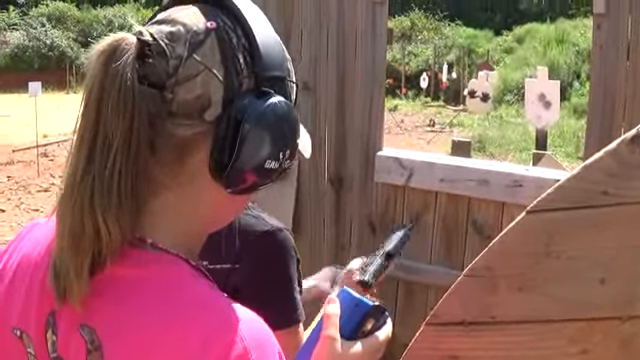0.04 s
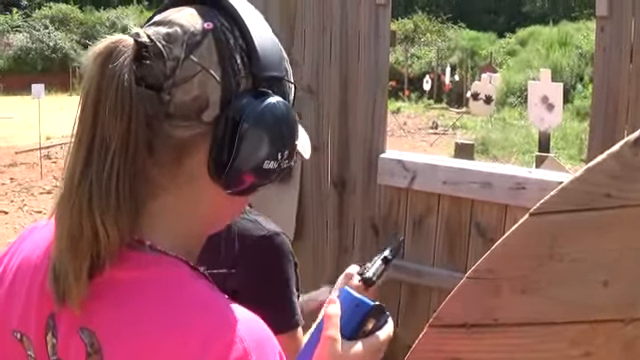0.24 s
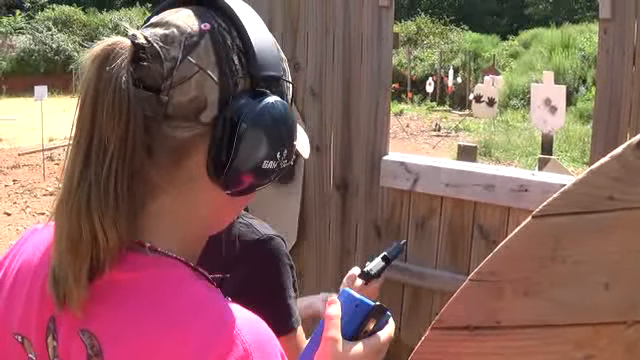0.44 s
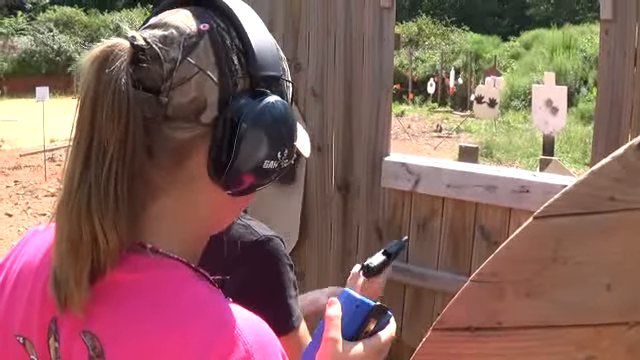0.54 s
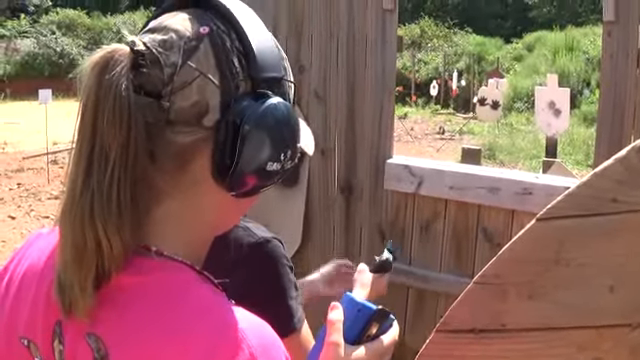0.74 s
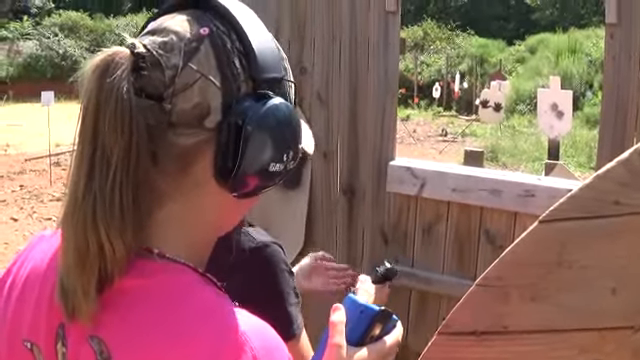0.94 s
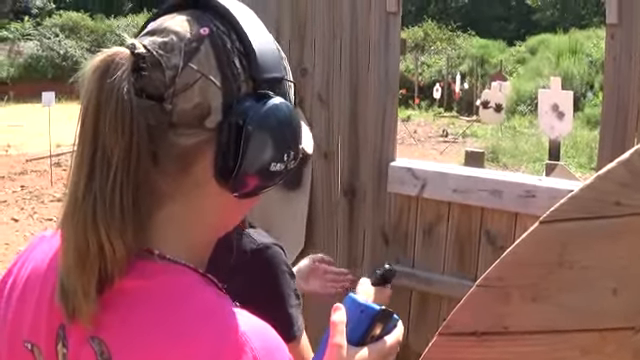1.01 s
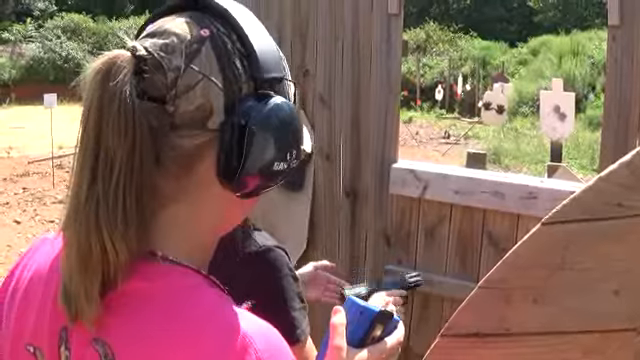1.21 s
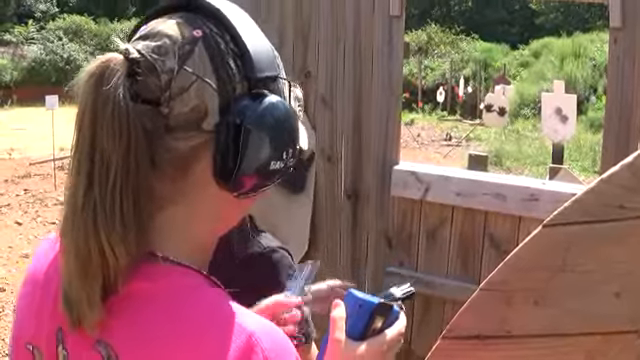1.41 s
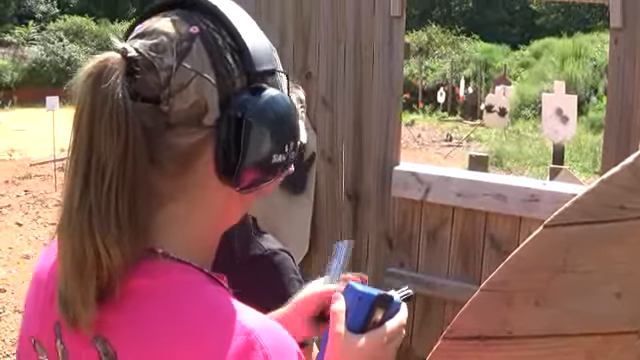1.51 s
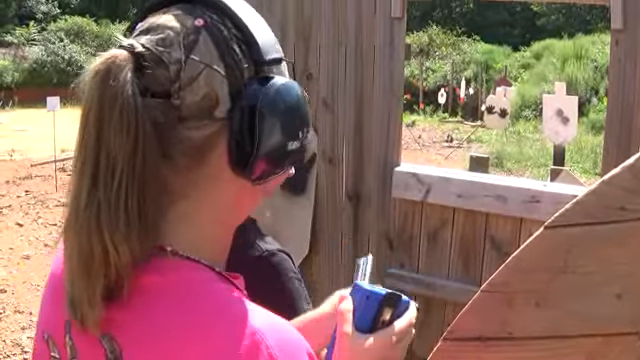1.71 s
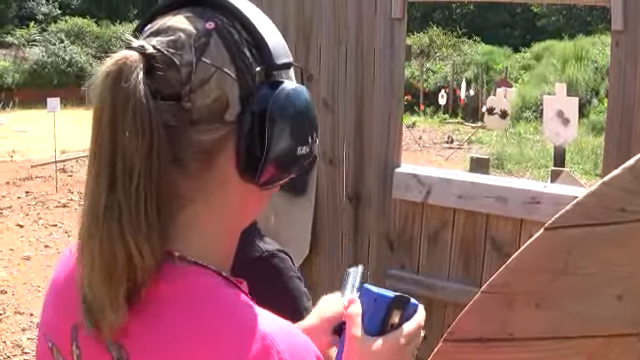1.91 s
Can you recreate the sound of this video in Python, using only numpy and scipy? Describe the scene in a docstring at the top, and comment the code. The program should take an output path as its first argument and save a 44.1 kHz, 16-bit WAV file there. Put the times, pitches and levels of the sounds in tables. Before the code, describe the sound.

In a wooden outdoor shooting bay, a nearby pistol slide closes with a single sharp, briefly ringing clack. Tiny clicks of handling come afterwards, while insects buzz faintly above a quiet wash and a low, distant hum.

```python
"""In a wooden shooting bay, a pistol slide is let go: a dull knock, then a bright clack a moment later.
The slide knocks the frame, steel hits steel, and the metal rings briefly.
The plank walls throw the sound back, and a few faint handling ticks follow.
Insects buzz in the bushes over a soft outdoor wash and a low, distant drone."""
import sys
import numpy as np
from scipy import signal
from scipy.fft import rfft, irfft
from scipy.io import wavfile
from scipy.ndimage import uniform_filter1d

SR = 44100
rng = np.random.default_rng(int(sys.argv[2]) if len(sys.argv) > 2 else 0)


def int16_out(signal):
    """Quantize to a 16-bit WAV file."""
    q = np.round(np.clip(np.atleast_2d(signal).T, -1, 1) * 32767)
    wavfile.write(sys.argv[1], SR, q.astype(np.int16))


N = 85995
HZ, T = np.fft.rfftfreq(N, 1 / SR), np.arange(N) / SR

# Blows inside the pistol: t/s, relative knock level/dB, relative crack level/dB
BLOWS = [(0.2125, -33, -22.5), (0.2149, -16, -18), (.2157, 0.5, -20), (0.2173, -33.5, -14),
         (.2205, -42, -8), (0.2213, -37.5, 0)]
# Tone of the frame's dull knock: f/Hz, relative level/dB
KNOCK_TONE = [(40, -23), (120, -17), (300, -8), (500, 1), (700, 3.5), (1200, -13), (2800, -7), (5000, -31),
              (14000, -45.5)]
# Tone of steel hitting steel: f/Hz, relative level/dB
CRACK_TONE = [(80, -35.5), (200, -29.5), (320, -8), (520, -12.5), (1050, -5.5), (1900, -8), (2800, 1.5),
              (3700, -5), (5400, -4), (6300, -10), (8500, -8.5), (11000, -11.5), (13200, -17.5),
              (14500, -44)]
# Ringing notes of the slide and barrel: f/Hz, relative level/dB, time to fade by 60 dB/s
STEEL_NOTES = [(718.3, -14.5, 0.137), (1080, -11.5, 0.138), (1710, -17.5, 0.161), (2444, -1, 0.162),
               (2620.7, -2, 0.17), (2792, -7, 0.2), (2886, 0, 0.184), (3030, -5, 0.224), (3445, -12, 0.216),
               (4102, -2.5, 0.135), (4390, -2.5, 0.089), (4748, -5.5, 0.115), (5366, -1.5, 0.1233),
               (6708, -5.5, 0.076)]

def slide(knock_gain_db=2, crack_gain_db=6.5, ring_gain_db=-39):
    """Each blow knocks the frame, cracks steel on steel and sets the slide ringing."""
    knock, steel, t = np.zeros(N), np.zeros(N), T[:16000]
    for s, knock_db, crack_db in BLOWS:
        add(knock, s, amp(knock_gain_db + knock_db) * contact(KNOCK_TONE, decay_s=.0014, rattle=.25))
        add(steel, s, amp(crack_gain_db + crack_db) * contact(CRACK_TONE, decay_s=.0025, rattle=2.5))
        ring = sum(rng.choice([-1, 1]) * amp(db) * fade(t, fade_s) * np.sin(2 * np.pi * hz * t)
                   for hz, db, fade_s in STEEL_NOTES)
        add(steel, s, amp(ring_gain_db + crack_db) * ring)
    return knock, steel


# Handling ticks: t/s, relative ring level/dB, snap level/dB, f/Hz
TICKS = [(0.3162, -40, -36, 9290), (1.347, -37.5, -30, 2414), (1.471, -44, -40, 2126),
         (1.573, -32, -38, 2924), (1.851, -43, -47, 3680)]

def handling(fade_s=.0196):
    """Small parts touch lightly, each with a snap and one short ringing note."""
    ticks, t = np.zeros(N), T[:4000]
    for s, ring_db, snap_db, hz in TICKS:
        add(ticks, s, amp(ring_db) * .5 * fade(t, fade_s) * np.sin(2 * np.pi * hz * t))
        add(ticks, s, amp(snap_db) * contact(CRACK_TONE, decay_s=.002, rattle=2.5))
    return ticks


# Echoes off planks and barricade: delay/s, left level/dB, right level/dB, right ear lag/s
ECHOES = [(.0035, -11, -5, -0.0027), (.0072, -9, -6, 0.0028), (.0112, -6, -5.5, .00008),
          (.0135, -10.5, -10, -.00006), (0.026, -19, -14.5, .00003), (.038, -23, -17, .00003)]

def plank_echoes(sound):
    """Each wooden surface sends back a late copy, slightly smeared by its roughness."""
    planks = 0
    for s, left_db, right_db, lag in ECHOES:
        delay = np.exp(-2j * np.pi * HZ * np.array([[s], [s + lag]]))
        smear = rfft(chatter(decay_s=.0008, rattle=1.8), N)
        planks = planks + amp([[left_db], [right_db]]) * delay * smear
    return irfft(rfft(sound) * planks, N)


# How long the bay holds each pitch: f/Hz, time to fade by 60 dB/s
BAY_FADE = [(150, 0.122), (400, 0.175), (1000, 0.174), (2800, 0.16), (5000, 0.1276), (12000, 0.1162)]

def bay_tail(sound, near_db=-2, far_db=-26, start_s=.00415, rise_s=.0047, likeness=.615):
    """Scattered echoes blur into a short tail, with a faint, longer return from the range."""
    noise = stereo(*rng.choice([-1., 1.], (2, N)), likeness)
    hz, t, slices = signal.stft(noise, SR, nperseg=256)
    near = signal.istft(slices * fade(t, look_up(BAY_FADE, hz)[:, None]), SR, nperseg=256)[1][:, :N]
    muffle = signal.butter(2, 3200, fs=SR, output="sos")
    far = signal.sosfilt(muffle, stereo(*rng.standard_normal((2, N)), likeness)) * fade(T, fade_s=.59)
    onset = np.clip((T - start_s) / rise_s, 0, 1)
    tail = (amp(near_db) * unit(near * onset) + amp(far_db) * unit(far * onset)) / np.sqrt(N)
    return signal.fftconvolve(sound[None], tail, axes=1)[:, :N]


# How wide the echoes spread: f/Hz, side level/dB
ECHO_WIDTH = [(100, -6.5), (1100, 1), (3000, 0), (4200, 1), (4800, -17.5), (7000, -5.5), (8000, -27.5),
              (12000, -32.5)]

def bay(sound):
    """All the bay's echoes together; their highest pitches come from straight ahead."""
    left, right = plank_echoes(sound) + bay_tail(sound)
    middle = (left + right) / 2
    side = irfft(rfft((left - right) / 2) * amp(look_up(ECHO_WIDTH, HZ)), N)
    return np.array([middle + side, middle - side])


# Insect choruses: f/Hz, half width/Hz, level/dB
CHORUSES = [(6903, 199, -59), (7617, 278, -55)]
# How the choruses swell together: t/s, level change/dB
CHORUS_SWELL = [(0, -1), (.35, 0.5), (.8, -1), (1.1, -0.05), (1.5, 1), (1.95, -1.5)]
# Thin, high insect hiss: t/s, level/dB
SIZZLE_LEVEL = [(0, -59.5), (.6, -58), (.85, -57.5), (1.2, -58), (1.35, -62), (1.95, -66)]

def insects(throb_hz=60, throb_db=1):
    """Many far insects blur into bands of noise that throb unevenly, under a thin sizzle."""
    buzz = np.zeros((2, N))
    for hz, width, db in CHORUSES:
        throb = unit(irfft(rfft(rng.standard_normal(N)) * np.exp(-(HZ / throb_hz) ** 2), N))
        buzz += amp(db) * unit(noise_band(hz, width) * amp(throb_db * throb))
    sizzle = noise_band(hz=12190, half_width_hz=1660) * swell(SIZZLE_LEVEL)
    return buzz * swell(CHORUS_SWELL) + sizzle


# Tone of the outdoor wash: f/Hz, relative level/dB
AIR_TONE = [(20, -5), (35, -8.5), (52, 2), (85, -0.5), (140, -0.5), (190, -1.5), (240, -0.5), (310, -0.5),
            (550, -3), (1050, -7), (1450, -5.5), (2900, -7), (4400, -12), (6100, -14.5), (8800, -11),
            (11000, -17), (12800, -17), (15200, -28)]
# How alike the outdoors sounds in both ears: f/Hz, likeness (1 = the same)
AIR_LIKENESS = [(50, 1), (200, 0.921), (600, 0.627), (1400, 0.444), (3000, 0.579), (4500, 0.59),
                (6000, 0.836), (7600, 0.744), (9000, 0.84), (10500, 1), (14000, 1)]

def air(level_db=-48, drift_db=1):
    """A steady outdoor wash in which patches of pitch drift slightly louder and softer."""
    spectra = stereo(*rfft(rng.standard_normal((2, N))), look_up(AIR_LIKENESS, HZ))
    wash = irfft(spectra * amp(look_up(AIR_TONE, HZ)), N)
    slices = signal.stft(wash, nperseg=1024)[2]
    patches = uniform_filter1d(rng.standard_normal(slices.shape[1:]), size=14, axis=0)  # blur in pitch
    patches = unit(uniform_filter1d(patches, size=6, axis=1))  # blur in time
    drifting = signal.istft(slices * amp(drift_db * patches), nperseg=1024)[1][:, :N]
    return amp(level_db) * unit(drifting)


# Loudness of the drone: t/s, level/dB
DRONE_LEVEL = [(0, -69.5), (.3, -56), (.7, -60), (.95, -69), (1.95, -67.5)]

def drone():
    """A low, distant hum swells and fades."""
    return noise_band(hz=194.2, half_width_hz=14.6) * swell(DRONE_LEVEL)


def contact(tone, decay_s, rattle, size=2048):
    """Two parts meet and chatter, in the tone of their material."""
    log_gain = np.log(amp(look_up(tone, abs(np.fft.fftfreq(size, 1 / SR)))))
    # Build a click with this tone that starts sharply.
    click = np.fft.ifft(np.exp(np.conj(signal.hilbert(log_gain)))).real[:size // 2]
    return signal.fftconvolve(chatter(decay_s, rattle), click / np.linalg.norm(click))


def chatter(decay_s, rattle, size=2048):
    """A click and a dying flurry of smaller ones; more rattle makes the flurry stronger."""
    decay = np.exp(-T[:size] / decay_s)
    clicks = rattle * rng.choice([-1., 1.], size) * decay / np.linalg.norm(decay)
    clicks[0] = 1
    for _ in range(6):  # make all pitches equally strong, keeping the flurry short
        even = irfft(np.exp(1j * np.angle(rfft(clicks))), size)
        clicks = even * np.minimum(10 * decay, 1)
    return clicks / np.linalg.norm(clicks)


def noise_band(hz, half_width_hz):
    """Stereo noise gathered around one pitch."""
    spectra = stereo(*rfft(rng.standard_normal((2, N))), look_up(AIR_LIKENESS, hz))
    return unit(irfft(spectra * np.exp(-(.5 * (HZ - hz) / half_width_hz) ** 2), N))


def stereo(a, b, likeness):
    """Blends two unrelated signals into left and right."""
    middle, side = a * np.sqrt((1 + likeness) / 2), b * np.sqrt((1 - likeness) / 2)
    return np.array([middle + side, middle - side])


def fade(t, fade_s):
    """Dies away by 60 dB every fade_s seconds."""
    return np.exp(-np.log(1000) * t / fade_s)


def swell(points):
    """Turns levels over time into a volume curve."""
    return amp(np.interp(T, *np.transpose(points)))


def look_up(points, hz):
    """Reads a table at any pitch, gliding between its rows."""
    f, value = np.transpose(points)
    return np.interp(np.log(hz + 1), np.log(f + 1), value)


def amp(db):
    """Turns decibels into a multiplier."""
    return 10 ** (np.asarray(db) / 20)


def unit(x):
    """Scales to an average strength (rms) of 1."""
    return x / np.sqrt(np.mean(x ** 2) + 1e-20)


def add(mix, s, sound):
    """Mixes a sound in at s seconds."""
    part = mix[max(round(s * SR), 0):][:len(sound)]
    part += sound[:len(part)]


def scene(knock_echo_db=-12.5, tick_echo_db=-8):
    """The pistol in its bay, with the outdoors behind."""
    knock, steel = slide()
    ticks = handling()
    echoes = bay(steel + amp(knock_echo_db) * knock + amp(tick_echo_db) * ticks)
    outdoors = air() + insects() + drone()
    return knock + steel + ticks + echoes + outdoors


def record(dry, cutoff_hz=15250):
    """Cuts away the very highest pitches."""
    low_pass = signal.firwin(511, cutoff_hz, window=("kaiser", 9), fs=SR)
    return signal.oaconvolve(dry, low_pass[None], "same")


dry = scene()
out = record(dry)
int16_out(out)
```